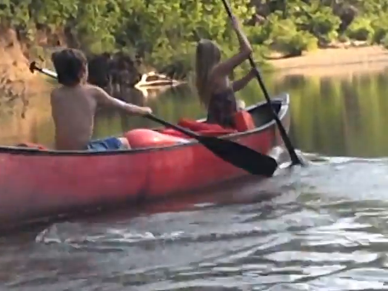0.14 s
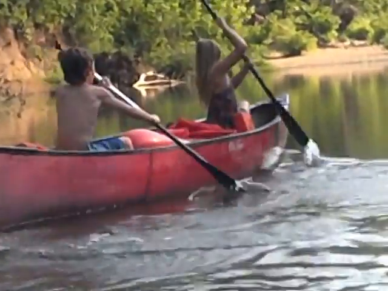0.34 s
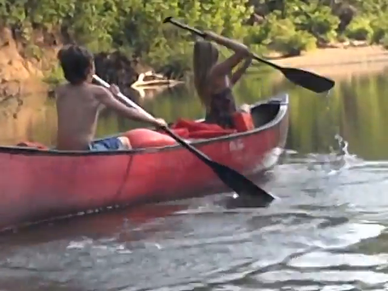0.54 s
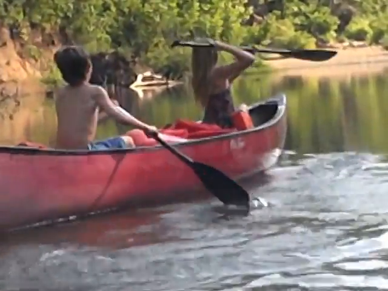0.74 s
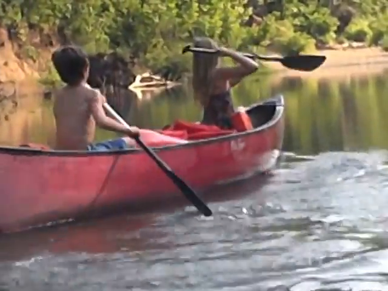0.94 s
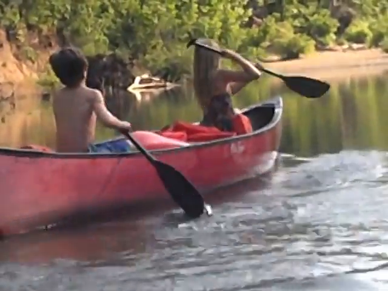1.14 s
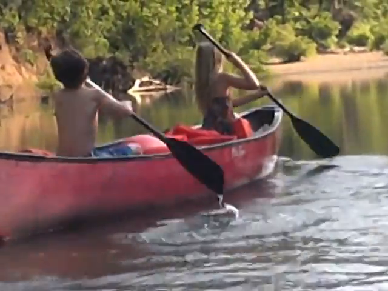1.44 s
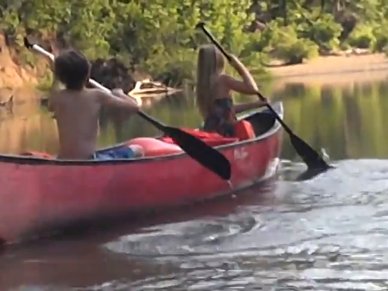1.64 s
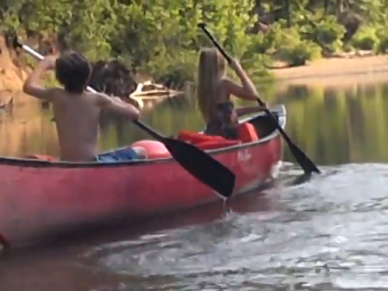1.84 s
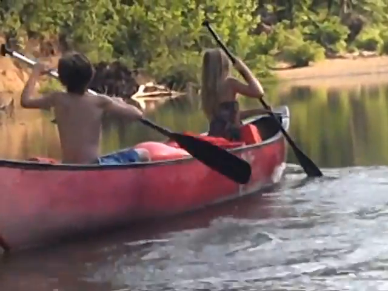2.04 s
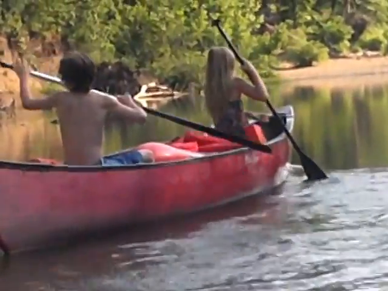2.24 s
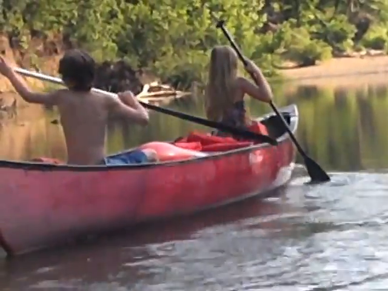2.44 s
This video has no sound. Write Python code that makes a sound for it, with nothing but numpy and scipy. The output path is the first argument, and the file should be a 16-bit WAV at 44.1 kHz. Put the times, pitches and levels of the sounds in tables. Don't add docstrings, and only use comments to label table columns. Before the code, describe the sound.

Canoe paddling on a calm creek: a loud hollow knock of shaft on hull with a splash comes early, then soft gurgles and drips, then a second bubbly stroke near the end, heard close outdoors.

```python
import sys
import numpy as np
from scipy import signal
from scipy.fft import rfft, irfft, next_fast_len
from scipy.io import wavfile
from scipy.ndimage import uniform_filter1d

SR = 44100
rng = np.random.default_rng(int(sys.argv[2]) if len(sys.argv) > 2 else 0)


def attenuation_scalar(level_db):
    decades = np.asarray(level_db, float) / 20
    return 10 ** decades


def materialize(psi):
    bounded = np.clip(np.atleast_2d(psi).T, -1, 1)
    quanta = np.round(bounded * 32767).astype(np.int16)
    wavfile.write(sys.argv[1], SR, quanta)


N = 114660

# (frequency [Hz], level [dB], decay time t60 [s])
HULL_MODES = [(96.2, -16, 0.19), (138, -12, 0.12), (172, -1.5, 0.16), (214.9, -4.5, 0.081),
              (260.2, -3.5, 0.088), (304, -1.5, 0.085), (375, 1.5, 0.044), (441.7, -8.5, 0.076),
              (528, -4, 0.072), (697, -9.5, 0.033), (800, -15, 0.036), (960, -18.5, 0.088),
              (1220, -34, 0.075)]


def read_curve(points, hz):
    f, value = np.transpose(points)
    return np.interp(np.log(hz + 1), np.log(f + 1), value)


def unit_rms(x):
    return x / np.sqrt(np.mean(x ** 2) + 1e-20)


def add(mix, s, sound):
    part = mix[max(round(s * SR), 0):][:len(sound)]
    part += sound[:len(part)]


def coloured(x, points):
    gain = attenuation_scalar(read_curve(points, np.fft.rfftfreq(len(x), 1 / SR)))
    return unit_rms(irfft(rfft(x) * gain, len(x)))


def bubble(hz, t60, rise, glide, size=3000):
    t = np.arange(size) / SR
    envelope = (1 - np.exp(-t / rise)) * attenuation_scalar(-60 * t / t60)
    return envelope * np.sin(2 * np.pi * hz * (t + glide * t ** 2 / t60))


def bubble_cloud(low_hz, high_hz, per_s, spread_db, cycles, count=30):
    size = attenuation_scalar(spread_db * np.minimum(rng.exponential(1, N), 4))
    size = size * (rng.random(N) < per_s / SR) * rng.choice([-1, 1], N)
    kind = rng.integers(0, count, N)
    cloud = np.zeros(N)
    for k, hz in enumerate(np.geomspace(low_hz, high_hz, count)):
        tone = bubble(hz, cycles / hz, 1.67 / hz, 0.19) * np.sqrt(hz)
        cloud += signal.oaconvolve(size * (kind == k), tone)[:N]
    return cloud


def air():
    # (frequency [Hz], level [dB])
    air_colour = [(70, -15.5), (160, -16.5), (300, -4.5), (900, 2.5), (3000, -7), (8000, -11.5),
                  (15000, -20)]
    return attenuation_scalar(-62) * coloured(rng.standard_normal(N), air_colour)


def water():
    # (time [s], gurgle level [dB], fizz level [dB])
    stirring = [(0, -49.5, -55.5), (.12, -56.5, -58), (.22, -53.5, -51), (.33, -44.5, -64), (.55, -49, -61),
                (.66, -66.5, -64.5), (.78, -49, -61.5), (.95, -49.5, -66.5), (1.2, -55.5, -58.5),
                (1.38, -52, -58.5), (1.519, -50, -63.5), (1.75, -68, -59), (1.86, -65.5, -59.5),
                (1.99, -62.5, -62.5), (2.099, -32.5, -52.5), (2.22, -45.5, -54.5), (2.418, -38.5, -51.5),
                (2.6, -47.5, -63.5)]
    # (frequency [Hz], level [dB])
    gurgle_colour = [(60, 12), (120, -7), (200, 3), (500, 1), (1000, -4), (2000, -8), (4000, -11)]
    fizz_colour = [(500, -2), (1500, -6), (3000, -7.5), (5000, -6), (9000, -8), (11000, -19), (15000, -20)]
    s, gurgle_db, fizz_db = np.transpose(stirring)
    t = np.arange(N) / SR
    lumps = unit_rms(uniform_filter1d(uniform_filter1d(rng.standard_normal(N), 900), 900))
    gurgle = coloured(bubble_cloud(127.2, 2426, 1500, 1.8, 13.2), gurgle_colour)
    hull_response = sum(attenuation_scalar(db) * bubble(hz, 2.33 * t60, 1 / hz, 0, size=9000) for hz, db, t60 in HULL_MODES)
    hum = unit_rms(signal.oaconvolve(gurgle, hull_response)[:N])
    gurgle = gurgle + attenuation_scalar(-7) * hum
    fizz = coloured(bubble_cloud(692, 14480, 4000, 2.7, 21.6), fizz_colour)
    gurgle_gain = attenuation_scalar(np.interp(t, s, gurgle_db) + 1.9 * lumps)
    fizz_gain = attenuation_scalar(np.interp(t, s, fizz_db) + 1.5 * lumps + 1.0)
    return gurgle * gurgle_gain + fizz * fizz_gain


def bubbles():
    # (time [s], level [dB], pitch [Hz], decay time t60 [s])
    plops = [(0.225, -33.5, 760, 0.023), (0.833, -30, 695, 0.031), (1.115, -25.5, 650, 0.015),
             (1.448, -34.5, 670, 0.069), (1.469, -35.5, 538, 0.052), (1.685, -46, 543, 0.048),
             (2.078, -14, 789, 0.015), (2.246, -38, 499, 0.12), (2.325, -21.5, 704, 0.047),
             (2.412, -33, 528, 0.12), (2.444, -36.5, 517, 0.14), (2.476, -28.5, 554, 0.047),
             (2.521, -35, 528, 0.091), (2.294, -15.5, 656, 0.028), (2.295, -14, 507, 0.018),
             (2.295, -31, 1340, 0.021), (2.093, -17, 172, 0.08), (2.104, -22.5, 299, 0.046),
             (2.119, -28, 193.5, 0.21), (0.0014, -29.5, 1320, 0.019), (0.3461, -34, 1054, 0.029),
             (0.4259, -39.5, 1070, 0.054), (0.5546, -40, 1230, 0.018), (1.6003, -42, 1354, 0.022),
             (1.8337, -47, 1460, 0.055), (1.9764, -39, 1450, 0.026), (2.0148, -33, 954, 0.029),
             (2.0497, -23, 1050, 0.03), (2.0727, -15, 1134, 0.019), (2.1121, -29.5, 970, 0.032)]
    # (time [s], level [dB], pitch [Hz])
    ticks = [(0.1047, -39.5, 1930), (2.0148, -25.5, 2084), (2.168, -33, 1940), (2.3236, -33, 2010),
             (2.3825, -31.5, 2030), (2.018, -33, 3000), (2.022, -32, 3400), (2.073, -26, 2620),
             (2.276, -39, 3050), (.2665, -31, 7000), (1.772, -46, 12500), (2.168, -44, 11500),
             (1.0171, -44, 4630), (2.5371, -36, 4100), (0.1544, -42, 8740), (0.5636, -46, 8820),
             (1.1807, -45, 8700), (1.5813, -42.5, 9900), (1.7729, -40.5, 11180), (1.9614, -42, 9200),
             (2.1645, -42.5, 9100), (2.4992, -48, 11000)]
    out = np.zeros(N)
    for s, db, hz, t60 in plops:
        add(out, s, attenuation_scalar(db + 2.0) * bubble(hz, t60 + 0.0073, 0.0013, 0.048, size=6000))
    for s, db, hz in ticks:
        add(out, s, attenuation_scalar(db + 1.5) * bubble(hz, 0.0023 + 40 / hz, 2.7 / hz, 0.053))
    return out


def splashes():
    # (time [s], slap level [dB], spray level [dB], decay time t60 [s])
    impacts = [(0.2466, -19, -39, 0.088), (0.338, -36.5, -60, 0.057), (0.4252, -38.5, -61, 0.036),
               (0.5377, -48, -69, 0.045), (0.5667, -42, -63, 0.041), (0.834, -41.5, -62.5, 0.046),
               (0.8932, -51, -58, 0.02), (1, -47, -75, 0.056), (1.114, -49, -65.5, 0.18),
               (1.3275, -54.5, -60, 0.089), (1.4696, -28.5, -38, 0.02), (1.7684, -73, -57, 0.06),
               (1.9952, -46.5, -53.5, 0.046), (2.014, -34.5, -48, 0.076), (2.0224, -41, -64, 0.13),
               (2.051, -36.5, -62, 0.063), (2.0707, -27, -51, 0.1), (2.166, -52, -51, 0.047),
               (2.2932, -34, -54, 0.096), (2.3027, -56, -51, 0.056), (2.4094, -37, -71, 0.035),
               (2.5354, -46.5, -59, 0.18)]
    # (frequency [Hz], level [dB])
    slap_colour = [(350, -13), (600, 2), (1500, -1.5), (2500, -2.5), (4000, -9), (6000, -15.5), (9000, -69)]
    spray_colour = [(3000, -12), (5000, 0), (7000, 0), (9000, -2), (11000, -11), (15000, -39)]
    slap_env, spray_env, t = np.zeros(N), np.zeros(N), np.arange(9000) / SR
    for s, slap_db, spray_db, t60 in impacts:
        fast = attenuation_scalar(-60 * t / (t60 + 0.001))
        slow = attenuation_scalar(-10 - 60 * t / (2.46 * t60 + 0.0035))
        shape = (1 - np.exp(-t / 0.00013)) * (fast + slow)
        add(slap_env, s, attenuation_scalar(slap_db - 2.0) * shape)
        add(spray_env, s, attenuation_scalar(spray_db + 3.5) * shape)
    slap = coloured(bubble_cloud(400, 5070, 5000, 2.3, 5.8), slap_colour)
    spray = coloured(bubble_cloud(2670, 10000, 11000, 6.0, 3.5), spray_colour)
    return slap_env * slap + spray_env * spray


def hull():
    # (time [s], level [dB])
    knocks = [(0.248, -8), (0.257, -8), (0.293, -25), (0.316, -29.5), (0.381, -41.5), (0.424, -41.5),
              (0.514, -38), (0.541, -41.5), (0.73, -44), (0.833, -41.5), (0.857, -45.5), (1.129, -34),
              (1.191, -41.5), (1.376, -37), (1.864, -47), (2.088, -18.5), (2.166, -33.5), (2.248, -30),
              (2.293, -23.5), (2.34, -29.5), (2.399, -29.5), (2.535, -39)]
    build_s = 0.004
    out, t = np.zeros(N), np.arange(9000) / SR
    for s, db in knocks:
        luck = rng.random((3, len(HULL_MODES)))
        for (hz, mode_db, t60), turn, share, drift in zip(HULL_MODES, *luck):
            swell = 1 - np.exp(-(t * hz / 300 / build_s) ** 2)
            pitch = hz * (1 + 0.012 * (2 * drift - 1))
            tone = np.sin(2 * np.pi * (pitch * t + turn))
            gain = attenuation_scalar(db + mode_db + 1.0 - 3.6 * share)
            add(out, s, gain * swell * attenuation_scalar(-60 * t / t60) * tone)
    return out


def scene():
    mono = air() + water() + bubbles() + splashes() + hull()
    return np.array([mono, mono])


def top_cut(x):
    return signal.sosfilt(signal.butter(12, 16080, fs=SR, output="sos"), x)


def record(dry):
    # (frequency [Hz], phase [rad])
    bass_lead = [(40, -1.7), (200, -1.4), (330, -.8), (480, -.4), (700, -.3), (1300, 0)]
    # (frequency [Hz], level [dB])
    balance = [(60, -1.5), (300, -2.3), (800, -1.3), (1300, 0)]
    late_samples, top_hz, bass_cut_hz = 17, 15200, 95
    size = next_fast_len(N + 4096)
    hz = np.fft.rfftfreq(size, 1 / SR)
    late_inverted = 2 * np.pi * hz * late_samples / SR - np.pi
    lead = np.where(hz < bass_lead[-1][0], read_curve(bass_lead, hz), late_inverted)
    side = np.array([[-0.5], [0.5]])
    cut = 1 / np.sqrt(1 + (bass_cut_hz / (hz + 1)) ** 4) * np.where(hz > top_hz, attenuation_scalar(-29), 1)
    stereo = np.exp(1j * side * lead) * attenuation_scalar(-side * read_curve(balance, hz))
    out = irfft(rfft(dry, size) * cut * stereo, size)[:, :N]
    return top_cut(out)


dry = scene()
out = record(dry)
materialize(out)
```